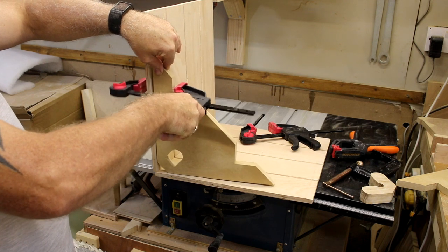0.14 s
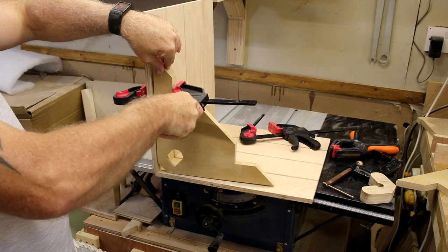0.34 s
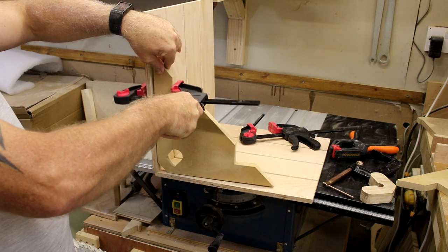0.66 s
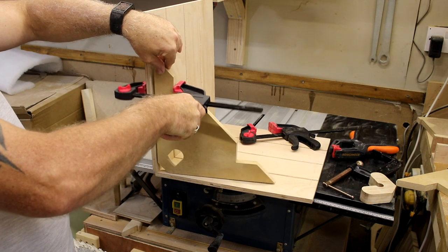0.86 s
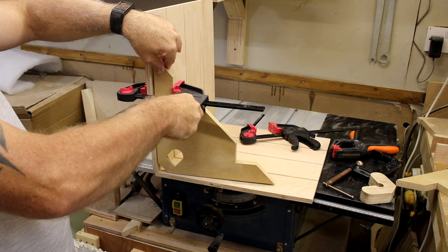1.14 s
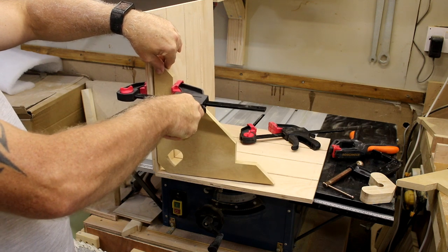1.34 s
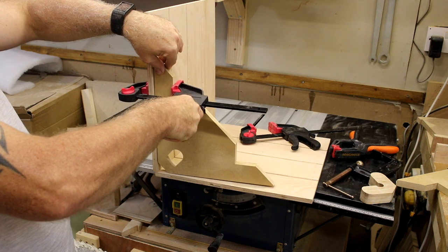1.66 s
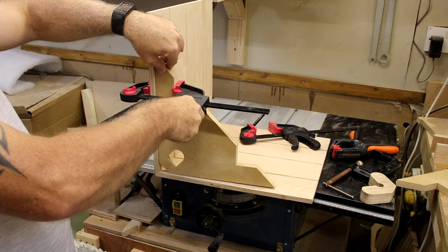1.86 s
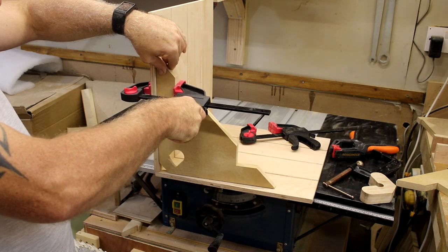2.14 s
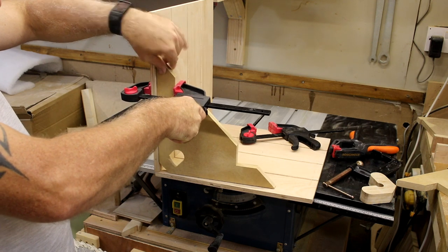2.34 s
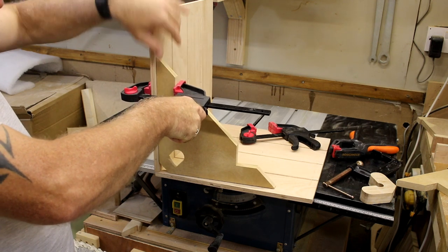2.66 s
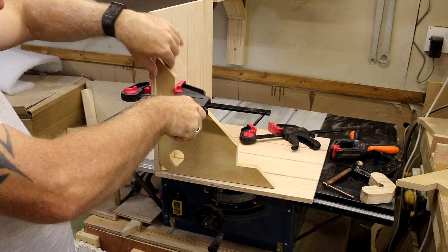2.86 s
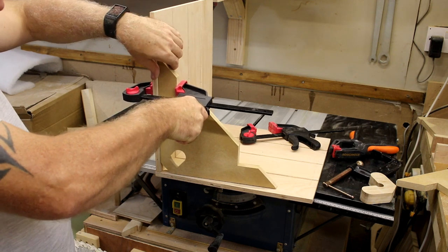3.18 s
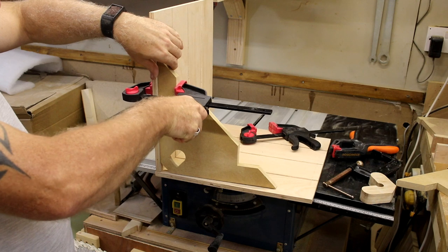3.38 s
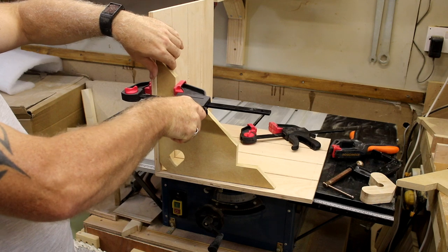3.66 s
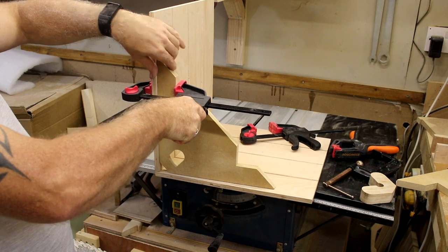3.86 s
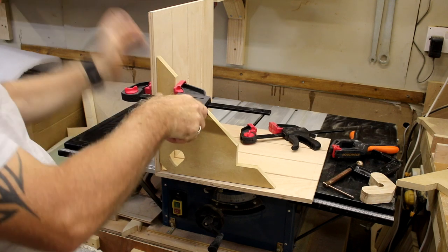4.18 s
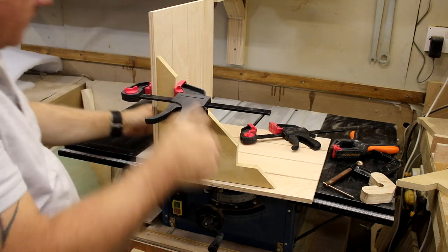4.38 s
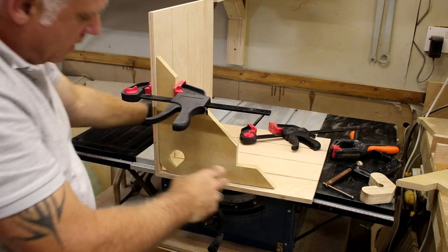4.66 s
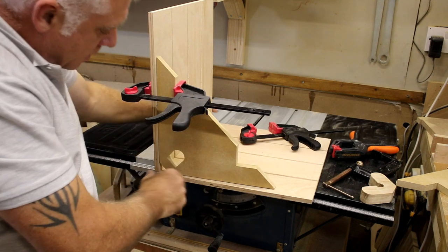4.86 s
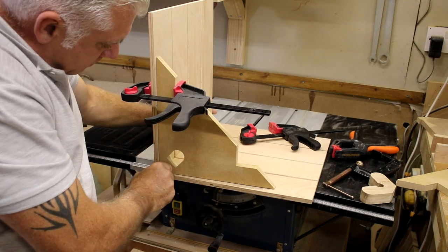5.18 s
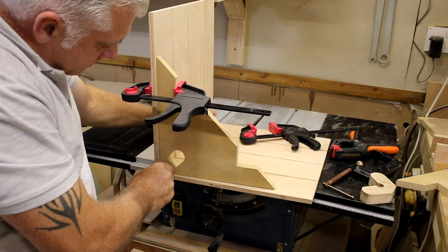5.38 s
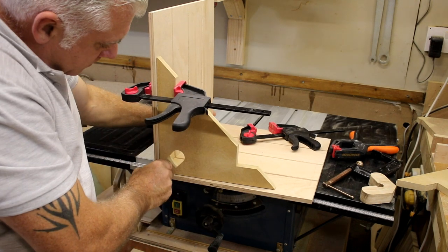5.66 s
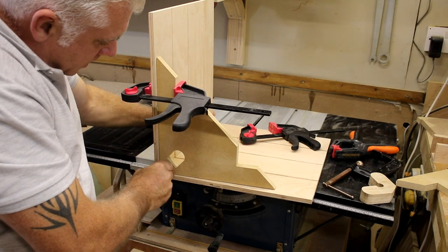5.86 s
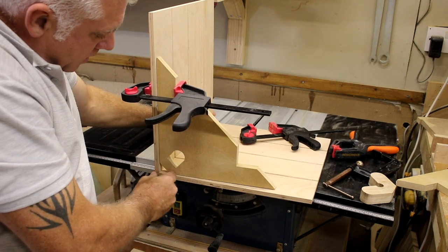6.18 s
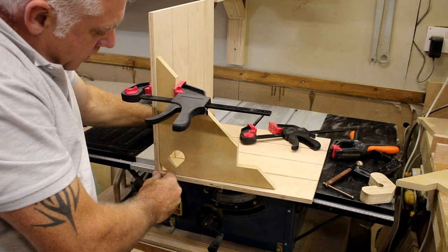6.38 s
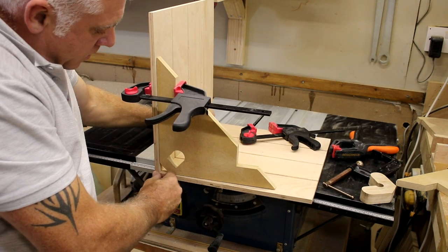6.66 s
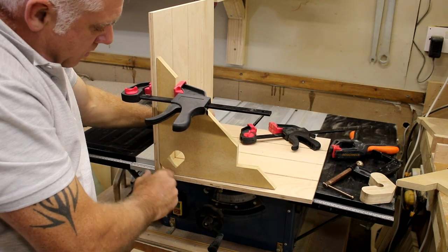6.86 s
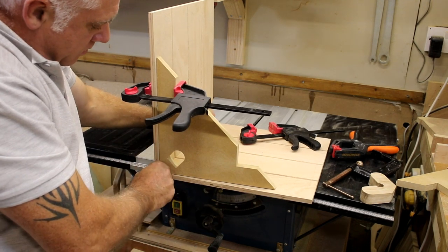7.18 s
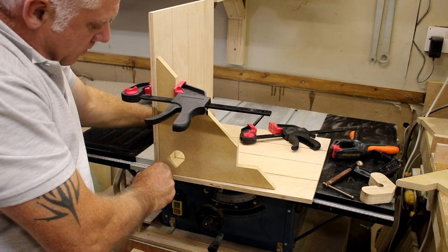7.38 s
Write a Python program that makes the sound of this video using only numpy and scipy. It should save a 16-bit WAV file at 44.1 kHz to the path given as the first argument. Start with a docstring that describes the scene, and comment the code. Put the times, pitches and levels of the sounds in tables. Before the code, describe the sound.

In a small workshop, a bar clamp is squeezed onto a wooden bracket and board, close to the microphone. The plastic trigger clicks irregularly, then the wood knocks several times over a low rumble from the saw table. Hands scrape lightly across the boards and a sleeve brushes past. A quick run of snaps leaves the steel bar ringing faintly, and a few soft rubs follow.

```python
"""A small workshop, microphone close and straight ahead: a quick-release bar clamp is squeezed onto a
wooden bracket and an upright board on a table saw. First the plastic trigger clicks and the wood shifts
with dull knocks, while the stand rumbles under the leaning weight. The hardest knocks come at about
2 s, and one rings the saw's top. Hands and parts scrape over the boards; from 4 s a sleeve brushes by.
Just after 5 s a run of snaps sets the steel bar ringing faintly, and a few light rubs end the job."""
import sys
import numpy as np
from scipy import signal
from scipy.fft import rfft, irfft, next_fast_len
from scipy.io import wavfile

SR = 44100
rng = np.random.default_rng(int(sys.argv[2]) if len(sys.argv) > 2 else 0)


def master(y):
    """Save y as 16-bit WAV."""
    cut = np.clip(np.atleast_2d(y).T, -1, 1)
    pcm = np.round(cut * 32767)  # scale
    wavfile.write(sys.argv[1], SR, pcm.astype(np.int16))


N = 332154
TIME = np.arange(N) / SR
HIT = np.arange(SR // 2) / SR  # time within one blow
BODY_HZ, EDGE_HZ, TOP_HZ = 1500, 4300, 16000  # tops of the body, the middle and the edge of a sound

# Noise colours: frequency_hz, relative_db
ROOM_AIR = [(15, -51), (25, -14.5), (43, -8), (64, -2), (82, -9.5), (141, -22.5), (184, -11), (284, -20),
            (637, -23.5), (881, -21.5), (3990, -28.5), (5520, -29), (15800, -30)]  # the still room
SLEEVE_COLOUR = [(1000, -7.5), (3500, 6), (6000, -3), (10000, 0), (13500, -1), (16000, -10)]  # skin and shirt
FRICTION_COLOUR = [(40, -9.5), (130, 7.5), (350, 7), (650, 6.5), (1050, 9.5), (1400, 3), (1900, 0.5),
                   (2500, 5), (3250, 2.5), (3900, -6.5), (4700, -20), (6500, -4.5), (11000, -9),
                   (15500, -18.5)]  # sliding on wood
RUB_BODY_BAND = [(900, -7), (1500, -10.5), (2600, -20.5), (5000, -57)]  # low share of a rub
RUB_MIDDLE_BAND = [(400, -41), (1200, -26), (1800, -3), (3500, 4), (4600, 13), (7000, -9.5), (14000, -45)]  # middle share, overlapping the other two
RUB_EDGE_BAND = [(1500, -37), (3500, 3), (5200, -8.5), (7000, -3.5)]  # high share
WOOD_DENSE = [(35, -43.5), (100, -21), (300, 4), (800, -2), (1300, -1), (1700, -12), (2500, -1.5),
              (3300, -3), (4000, -9), (5000, -27), (8000, -26.5), (15000, -56)]  # the wood's many short-lived modes
PLASTIC_DENSE = [(150, 5.5), (700, -3.5), (1100, -2.5), (1600, -5), (2400, 4), (3200, -5.5), (4300, 10),
                 (6000, -0.5), (8200, -8.5), (9500, -15.5), (11000, -14), (15500, -28)]  # the plastic's many short-lived modes
RUMBLE_COLOUR = [(25, -18), (45, -19.5), (66, 5.5), (100, -7.5), (170, -17), (350, -12.5), (700, -33.5),
                 (2000, -51.5), (8000, -74)]
HISS_COLOUR = [(30, -4.5), (150, -3.5), (600, -5), (2500, -14), (6000, -7.5), (12000, -6), (16000, -7.5)]

# Ringing modes of each part: pitch_hz, relative_db, t60_s
STAND_MODES = [(64, 1, 0.21), (96.2, -2, 0.35), (130.7, -3, 0.25), (215.5, 0.5, 0.082)]
SAW_TOP_MODES = [(307, -5, .45), (458, 0, .73), (678, 0, .34), (818, -4, .52), (947, -6, .43)]
BAR_MODES = [(3203, -8, .4), (3715, -10, .5), (3779, -3, .62), (3815, -9, .5), (3870, -8, .4),
             (3978, -2, .48), (4048, -2, .38), (4285, -9, .55), (4560, -17, .5)]
WOOD_MODES = [(132.3, -4.5, 0.24), (229, -16, 0.144), (277, -4, 0.084), (345.7, 3.5, 0.21),
              (503.6, -4, 0.26), (576.5, -2, 0.198), (660, 5, 0.057), (764, 4.5, 0.1), (976, 0.5, 0.15),
              (1165, 5, 0.065), (1290, 2.5, 0.063), (1953, -1, 0.042), (2230, -26.5, 0.068),
              (2558, 3.5, 0.039), (2920, -2, 0.015), (3145, 6, 0.075), (3420, -32, 0.082)]
PLASTIC_MODES = [(1074, -7.5, 0.041), (1227, -23, 0.097), (1370, -21.5, 0.03), (2070, -51, 0.021),
                 (2450, -40, 0.011), (2850, -10, 0.03), (3044, -5, 0.02), (3280, -12, 0.089),
                 (4680, -15, 0.076), (5830, -45, 0.013), (7320, -27, .05)]
# Hollow resonances that rubbing brings out: pitch_hz, width_hz, relative_db
HOLLOW_MODES = [(626.5, 110, 1.5), (1319, 130, -4.5), (1865, 270, -1), (2230, 170, -7.5), (2737, 40, -3.5),
                (2990, 66, 2), (3493, 45, -6.5)]

# The hands grip the work, shift, then only steady it: start_s, end_s, rumble_db, creep_db
HAND_HOLDS = [(0, 2.27, -52, -62), (2.8, 3.58, -50.5, -62.5), (3.92, 6.25, -57.5, -67)]
# Soft pushes on the stand: start_s, level_db
STAND_PUSHES = [(.325, -41.5), (0.643, -47), (1.028, -48), (1.13, -37), (1.442, -30), (1.697, -35.5),
                (1.94, -26.5), (2, -23.5), (3.121, -37), (3.574, -40), (4.088, -34), (4.292, -37),
                (4.998, -26), (5.95, -44)]
# Skin and shirt brush past: start_s, level_db, attack_s, hold_s, release_s
SLEEVE_SWISHES = [(3.9, -52, 0.045, 0.36, 0.056), (4.128, -38.5, .004, .012, 0.013),
                  (4.514, -45, 0.029, 0.27, 0.1)]
# A sliding contact catches: start_s, level_db, attack_s, hold_s, release_s
RASP_CATCHES = [(4.69, -35.5, 0.01, 0.016, 0.011), (4.755, -41, .015, .02, .02)]
# Blows that ring the steel bar: start_s, level_db
BAR_STRIKES = [(5.071, -39), (5.105, -36), (5.314, -33), (5.42, -41)]
# Steel locking plates snap on the bar: start_s, pitch_hz, level_db, t60_s
PLATE_SNAPS = [(0.1345, 10100, -37, 0.036), (.709, 7850, -23.5, .049), (0.755, 7850, -25, 0.041),
               (1.157, 7660, -25, 0.047), (1.4, 6600, -42.5, 0.1), (5.101, 10040, -37.5, 0.21),
               (5.3139, 10300, -31.5, 0.18)]

# Below, level_db sets the middle band; body_db and edge_db are relative to it.
# Sliding strokes: fastest_s, level_db, body_db, length_s
RUB_STROKES = [(1.315, -49, -1, 0.031), (1.492, -54.5, 2.5, 0.11), (1.914, -33.5, -3, 0.037),
               (2.426, -45, -1, 0.029), (2.508, -46.5, -1.5, .055), (2.853, -39.5, -2.5, 0.096),
               (3.186, -50, 4.5, 0.13), (3.412, -50, -0.5, 0.078), (3.976, -47, -0.5, 0.085),
               (4.64, -49.5, 0.5, 0.043), (4.747, -38.5, -9.5, 0.098), (4.956, -46, -1.5, 0.27),
               (5.364, -39.5, -1.5, 0.078), (5.429, -51, 6, .1), (5.688, -52, 7, 0.066),
               (5.83, -50.5, -2, 0.028), (5.942, -47, 6, 0.025), (6.044, -48, 0, 0.21),
               (6.158, -44, 2.5, 0.052), (6.28, -62, 4, 0.19), (6.601, -58, 7, 0.051),
               (6.879, -48, 4.5, 0.02), (7.176, -57, .5, 0.044)]
# Wood knocks: start_s, level_db, body_db, edge_db, chatter_s, spot_hz (resonance the struck spot favours)
WOOD_KNOCKS = [(.0155, -44.5, 12, -19, 0.023, 760), (.3885, -44, 12, -26, .005, 254),
               (.443, -59, 23, -13, 0.007, 770), (1.098, -54.5, 6, -4, 0.019, 414),
               (1.391, -48, 5.5, -22, 0.0061, 790), (1.733, -43, 2, -17, 0.0074, 1310),
               (1.75, -44.5, -8, -13, 0.0032, 1140), (1.9385, -23, -4.5, -23.5, 0.0015, 2030),
               (1.9415, -18, -6, -32, 0.00081, 3160), (1.9995, -29.5, 2, -31, 0.0045, 770),
               (2.1897, -23, -6.5, -9.5, 0.0034, 3490), (2.229, -34.5, 3, -13, 0.0052, 520),
               (3.095, -54, 15, -12, 0.015, 322), (3.127, -26, -5, -17, 0.0071, 3070),
               (3.664, -62, 12.5, -10, 0.011, 367), (4.081, -35.5, 0, -20, 0.0053, 1600),
               (4.281, -36.5, -3, -30, .025, 215)]
# Clicks of the trigger and jaws: start_s, level_db, body_db, chatter_s, spot_hz
CLAMP_CLICKS = [(0.0857, -34.5, -21, 0.0027, 3780), (0.1332, -24.5, -14, 0.0023, 3320),
                (.4893, -31.5, -28, 0.0024, 3080), (0.541, -42, -5, 0.0016, 1360),
                (0.623, -41.5, -12, 0.0035, 3270), (.67, -42, -19, 0.0065, 3500),
                (.709, -27, -17, 0.0045, 3700), (0.7542, -28.5, -18, 0.0045, 4000),
                (0.8628, -34.5, -26, .0017, 2920), (0.9091, -39.5, -9, 0.0032, 1850),
                (1.003, -41.5, -10, 0.013, 3870), (1.1593, -31, -12.5, .0044, 4330),
                (1.191, -41.5, 0, 0.003, 1500), (1.2486, -30, -19.5, .0015, 4020),
                (1.455, -43.5, -6, .01, 2900), (1.673, -39.5, -11, 0.0014, 3030),
                (2.102, -41.5, -11, 0.0018, 2530), (2.6766, -37.5, -13, 0.0024, 2600),
                (3.537, -46.5, -8, 0.022, 2570), (4.13, -30.5, -16, 0.0062, 3660),
                (5.034, -28.5, -9.5, 0.028, 4230), (5.072, -28, -8.5, 0.029, 4400),
                (5.105, -31.5, -11, .03, 4300), (5.3151, -27, -16, 0.017, 3840),
                (5.8828, -36, -27, .001, 3860)]


def undb(db):
    """Decibels to gain."""
    return 10 ** (np.asarray(db) / 20)


def rms(x):
    """Root mean square."""
    return np.sqrt(np.mean(x ** 2)) + 1e-12


def fade(t60):
    """Exponential decay by 60 dB in t60 seconds."""
    return np.exp(-np.log(1000) * HIT / t60)


def add(track, start_s, sound):
    """Mix a sound into the track."""
    start = int(start_s * SR)
    track[start:start + len(sound)] += sound[:N - start]


def tint(x, colour):
    """Give a sound a smooth colour, at unit level."""
    hz, db = np.transpose(colour)
    length = next_fast_len(len(x))
    bins_hz = np.arange(length // 2 + 1) * SR / length
    gain = undb(np.interp(np.log(bins_hz + 1), np.log(hz), db))
    out = irfft(rfft(x, length) * gain, length)[:len(x)]
    return out / rms(out)


def noise(colour, size):
    """Coloured noise at unit level."""
    return tint(rng.standard_normal(size), colour)


def flutter(hz):
    """A random level that changes hz times a second."""
    return np.interp(TIME * hz, np.arange(4096), rng.standard_normal(4096))


def swell(start_s, attack_s, hold_s, release_s):
    """Rise, hold, then die away exponentially."""
    lag = TIME - start_s
    return np.clip(lag / attack_s, 0, 1) * np.exp(-np.maximum(lag - attack_s - hold_s, 0) / release_s)


def swells(events):
    """The summed gain of several swelling events."""
    return sum(undb(db) * swell(start_s, *shape) for start_s, db, *shape in events)


def resonate(x, hz, width):
    """One resonance; width is a share of its frequency."""
    return signal.lfilter(*signal.iirpeak(hz, 1 / width, fs=SR), x)


def ring(modes, scatter_db=0.5, detune=0):
    """Decaying modes; each blow lands elsewhere and weights them anew."""
    out = np.zeros(len(HIT))
    for hz, db, t60 in modes:
        weight, drift, polarity = rng.standard_normal(3)
        tone = np.sin(2 * np.pi * hz * (1 + detune * drift) * HIT)
        out += np.sign(polarity) * undb(db + scatter_db * weight) * fade(t60) * tone
    return out


def registers(x):
    """Split a sound into body, middle and edge."""
    bands = [(4, BODY_HZ, "low"), (4, [BODY_HZ, EDGE_HZ], "band"), (8, EDGE_HZ, "high")]
    return [signal.sosfilt(signal.butter(*band, fs=SR, output="sos"), x) for band in bands]


def blows(events, modes, dense_colour, dense_db, dense_t60, crack_db, crack_t60,
          chatter_db, detune, spot_db):
    """A contact snaps and chatters for some milliseconds, ringing the part; hardness shapes the bands."""
    out = np.zeros(N)
    attack = SR // 40
    dense_decay = (undb(crack_db) * fade(crack_t60)) ** 2 + fade(dense_t60) ** 2
    for start_s, db, body_db, edge_db, chatter_s, spot_hz in events:
        slips = rng.standard_normal(attack) ** 3 * np.exp(-HIT[:attack] / chatter_s)
        force = undb(chatter_db) * slips / np.linalg.norm(slips)
        force[0] += 1  # the first snap
        tones = signal.fftconvolve(ring(modes, scatter_db=1, detune=detune), force)[:len(HIT)]
        # every slip also feeds the dense, short-lived modes, whose energies add
        energy = np.abs(signal.fftconvolve(dense_decay, force ** 2)[:len(HIT)])
        dense = noise(dense_colour, len(HIT)) * np.sqrt(energy)
        part = tones / rms(tones) + undb(dense_db) * dense / rms(dense)
        # the place of contact drives one resonance harder than the rest
        part = part + undb(spot_db) * resonate(part, spot_hz, width=0.2)
        for band, relative_db in zip(registers(part), (body_db, 0, edge_db)):
            add(out, start_s, undb(db + relative_db) * band / rms(band[:attack]))
    return out


def diffuse_tail(x, body_t60=0.15, middle_t60=0.14, edge_t60=0.147, build_s=0.0093):
    """Smear a sound into a short, dense, decaying tail."""
    body, middle, edge = registers(rng.standard_normal(len(HIT)))
    tail = body * fade(body_t60) + middle * fade(middle_t60) + 0.95 * edge * fade(edge_t60)
    tail *= np.clip(HIT / build_s - 0.5, 0, 1)
    return signal.fftconvolve(x, tail / np.linalg.norm(tail))[:N]


def hand_pressure(grip_s=0.015, let_go_s=0.21, sway_db=4, sway_hz=7):
    """Gains of the stand's rumble and the fingers' creep; both follow the hands' uneven pressure."""
    gains = sum(undb([[rumble_db], [creep_db]]) * swell(start_s, grip_s, end_s - start_s, let_go_s)
                for start_s, end_s, rumble_db, creep_db in HAND_HOLDS)
    return gains * undb(sway_db * flutter(sway_hz))


def stand(rumble_gain, push_s=0.0037, rest_db=-59):
    """Soft pushes rock the stand, and its faint rumble grows while the hands work."""
    thuds = np.zeros(N)
    for start_s, db in STAND_PUSHES:
        thud = ring(STAND_MODES, scatter_db=2, detune=0.07) * (1 - np.exp(-HIT / push_s))
        add(thuds, start_s, undb(db) * thud / np.abs(thud).max())
    return thuds + noise(RUMBLE_COLOUR, N) * np.hypot(rumble_gain, undb(rest_db))


def sleeve(grain_db=2.2, flutter_db=1.7, flutter_hz=90):
    """An airy swish of catching fibres as the arms swing round."""
    sizes = np.minimum(rng.exponential(size=N), 4)
    fibres = tint(rng.standard_normal(N) * undb(grain_db * sizes), SLEEVE_COLOUR)
    return fibres * swells(SLEEVE_SWISHES) * undb(flutter_db * flutter(flutter_hz))


def rasping(pitch_hz=3460, slips_per_s=416, scatter_db=3):
    """Irregular stick and slip drives one narrow resonance."""
    slips = (rng.random(N) < slips_per_s / SR) * undb(scatter_db * rng.standard_normal(N))
    tone = resonate(slips, pitch_hz, width=0.08)
    tone = resonate(tone, pitch_hz, width=0.73)  # trims the skirts
    return tone / rms(tone) * swells(RASP_CATCHES)


def scraping(creep_gain, grain_db=1.5, boards_db=-9, hollow_db=-4, creep_body_db=2, edge_db=-6):
    """Tiny catches of the wood grain, in uneven spurts, excite the boards while something slides."""
    sizes = np.minimum(rng.exponential(size=N), 3)
    catches = rng.standard_normal(N)
    judder_db = 2.5 * flutter(hz=110)
    grip_db = 1.87 * flutter(hz=28)
    catches *= undb(grain_db * sizes + judder_db + grip_db)
    boards = signal.fftconvolve(catches, ring(WOOD_MODES))[:N]
    hollow = sum(undb(db) * resonate(catches, hz, width_hz / hz) for hz, width_hz, db in HOLLOW_MODES)
    rub = tint(catches, FRICTION_COLOUR)
    rub += undb(boards_db) * boards / rms(boards) + undb(hollow_db) * hollow / rms(hollow)
    # the fingers creep while they hold; each stroke adds its power in three bands
    powers = (undb([[creep_body_db], [0], [edge_db]]) * creep_gain) ** 2
    for fastest_s, db, body_db, length_s in RUB_STROKES:
        near = slice(*np.searchsorted(TIME, [fastest_s - 0.5, fastest_s + 0.5]))
        lag = TIME[near] - fastest_s
        ramp_s = length_s * np.where(lag < 0, 0.45, 0.55)  # speeding up, slowing down
        speed = np.exp(-(lag / ramp_s) ** 2)
        powers[:, near] += undb([[db + body_db], [db], [db + edge_db]]) ** 2 * speed
    bands = (RUB_BODY_BAND, RUB_MIDDLE_BAND, RUB_EDGE_BAND)
    return sum(np.sqrt(power) * tint(rub, band) for power, band in zip(powers, bands))


def saw_top(start_s=2.19, level_db=-36):
    """One knock reaches the saw's metal top and rings it."""
    out = np.zeros(N)
    add(out, start_s, undb(level_db) * ring(SAW_TOP_MODES))
    return out


def steel_bar():
    """The bar sings on after the last snaps."""
    out = np.zeros(N)
    for start_s, db in BAR_STRIKES:
        add(out, start_s, undb(db) * ring(BAR_MODES))
    return out


def locking_plates():
    """Each snap of the plates on the bar rings a tight cluster of high, short modes."""
    out = np.zeros(N)
    for start_s, hz, db, t60 in PLATE_SNAPS:
        cluster = resonate(rng.standard_normal(len(HIT)), hz, width=0.087)
        add(out, start_s, undb(db) * cluster / rms(cluster) * fade(t60))
    return out


def wood_knocks():
    """Bracket and board shift and knock, ringing the wood's damped modes."""
    return blows(WOOD_KNOCKS, WOOD_MODES, WOOD_DENSE, dense_db=-1, dense_t60=0.054,
                 crack_db=6, crack_t60=0.0073, chatter_db=2, detune=0.0016, spot_db=5.5)


def clamp_clicks(edge_db=-5, edge_at_hz=3340, db_per_octave=8.5):
    """The plastic trigger and jaws click; stiffer, higher-pitched spots snap more brightly."""
    clicks = [(start_s, db, body_db, edge_db + db_per_octave * np.log2(hz / edge_at_hz), chatter_s, hz)
              for start_s, db, body_db, chatter_s, hz in CLAMP_CLICKS]
    return blows(clicks, PLASTIC_MODES, PLASTIC_DENSE, dense_db=5, dense_t60=0.11,
                 crack_db=8.5, crack_t60=0.013, chatter_db=5, detune=0.018, spot_db=5)


def scene(echo_db=-11, stereo_spread_db=-41, air_db=-57.5, hiss_db=-63.5, low_cut_hz=48):
    """Close and dead ahead; only faint hiss and a slight stereo spread of the work sounds have width."""
    work = wood_knocks() + clamp_clicks()
    rumble_gain, creep_gain = hand_pressure()
    work += scraping(creep_gain) + steel_bar() + saw_top() + locking_plates() + sleeve() + rasping()
    # the deepest bass of the work and the stand is gently cut away
    low_cut = signal.butter(2, low_cut_hz, "high", fs=SR, output="sos")
    direct = signal.sosfilt(low_cut, work + stand(rumble_gain))
    echo = undb(echo_db) * diffuse_tail(work)  # off the workshop's walls and clutter
    mid = direct + echo + undb(air_db) * noise(ROOM_AIR, N)
    side = undb(hiss_db) * noise(HISS_COLOUR, N) + undb(stereo_spread_db) * diffuse_tail(work)
    return np.array([mid + side, mid - side])


def record(dry):
    """The recorder clips at full scale and cuts the top."""
    high_cut = signal.ellip(10, 0.2, 70, TOP_HZ, fs=SR, output="sos")
    return signal.sosfilt(high_cut, np.clip(dry, -1, 1))


dry = scene()
out = record(dry)
master(out)
```